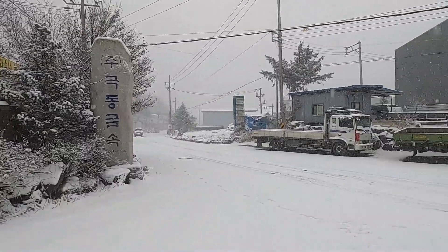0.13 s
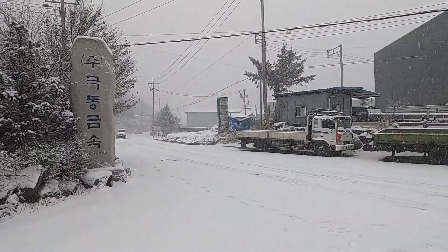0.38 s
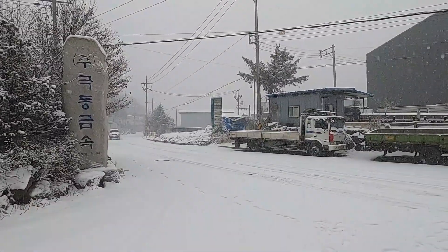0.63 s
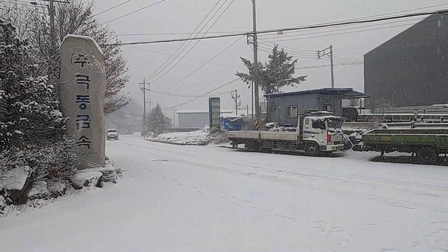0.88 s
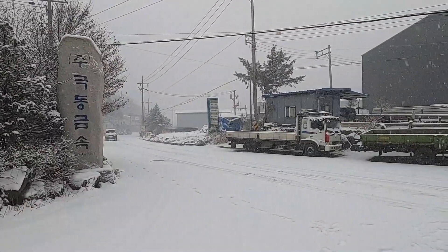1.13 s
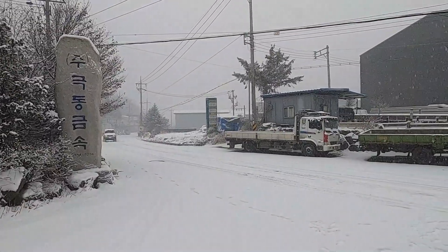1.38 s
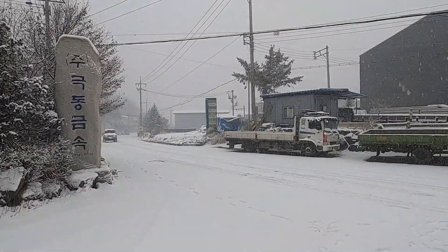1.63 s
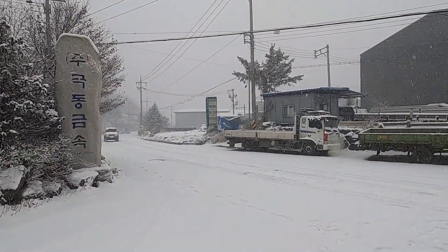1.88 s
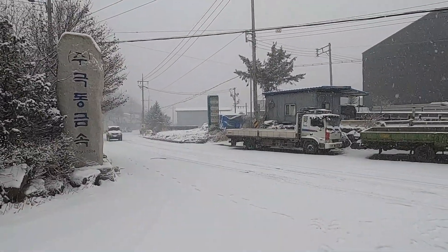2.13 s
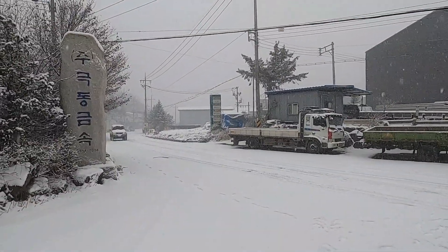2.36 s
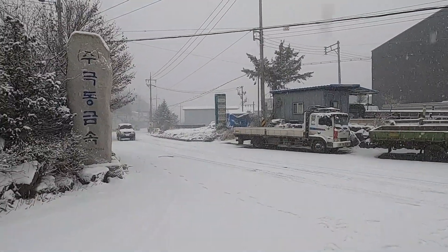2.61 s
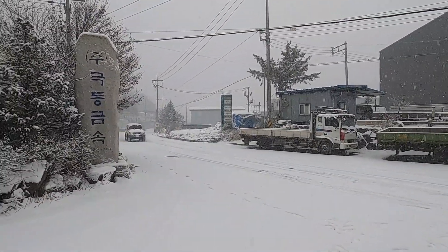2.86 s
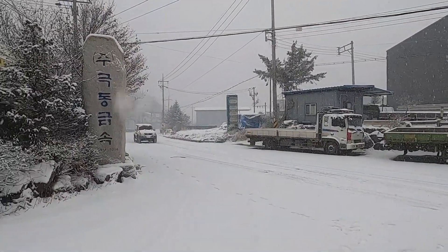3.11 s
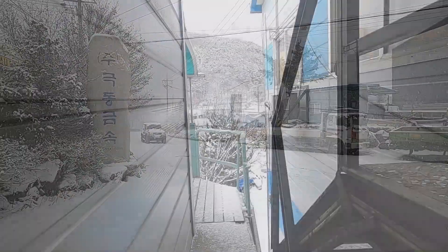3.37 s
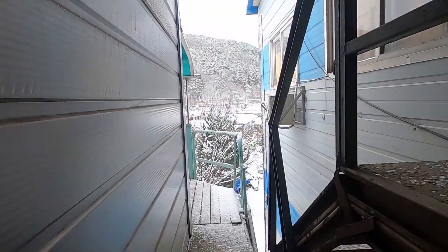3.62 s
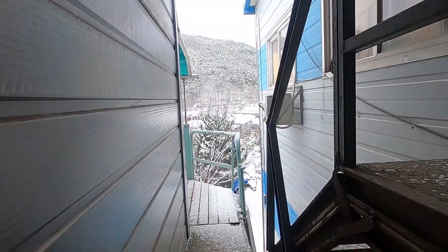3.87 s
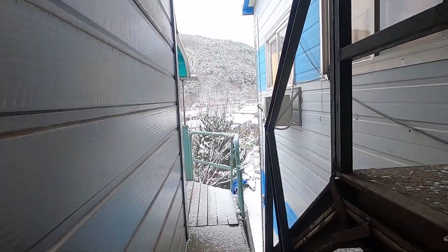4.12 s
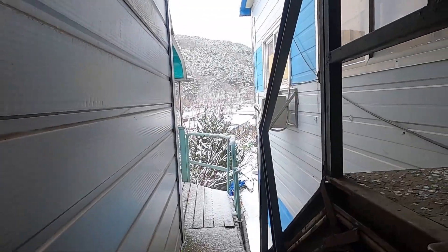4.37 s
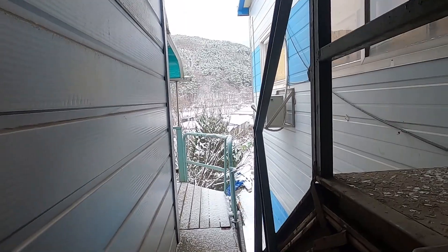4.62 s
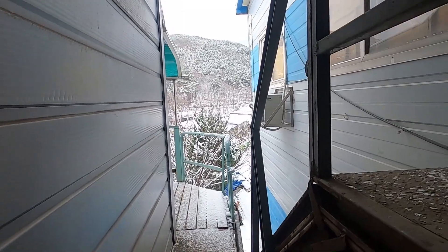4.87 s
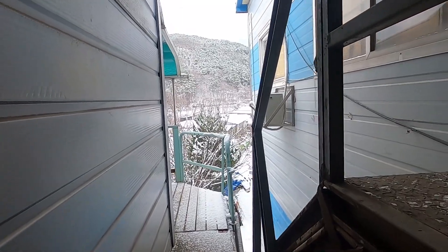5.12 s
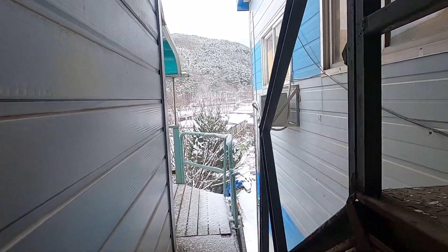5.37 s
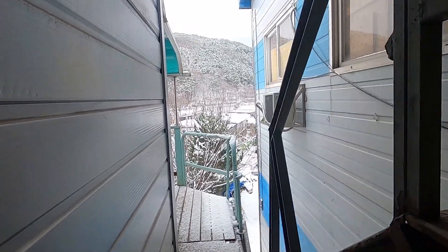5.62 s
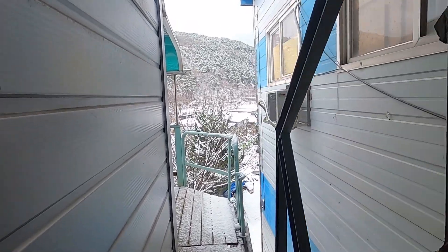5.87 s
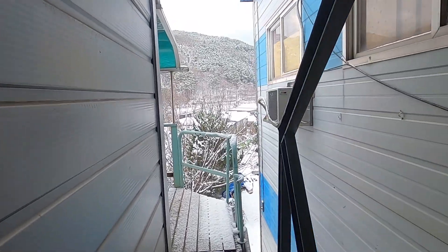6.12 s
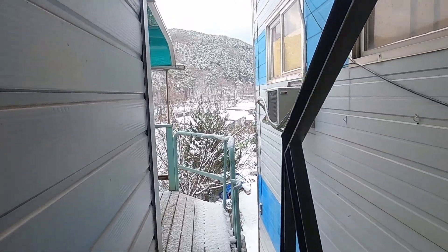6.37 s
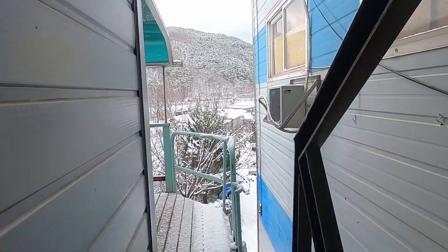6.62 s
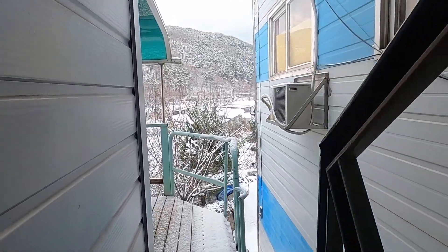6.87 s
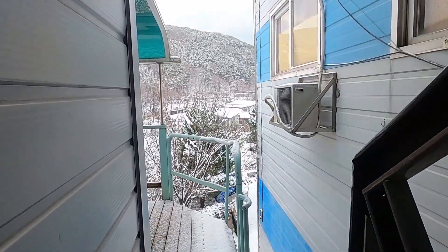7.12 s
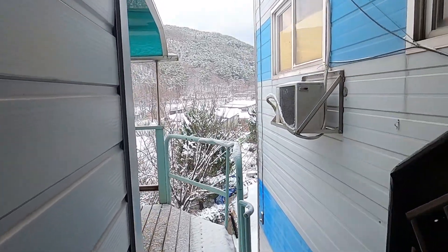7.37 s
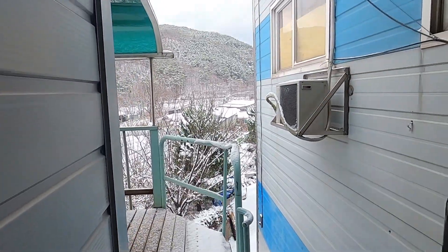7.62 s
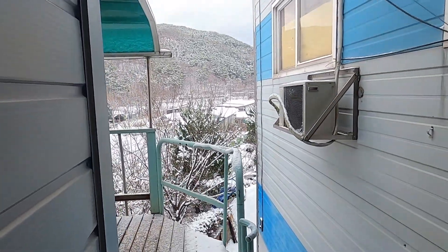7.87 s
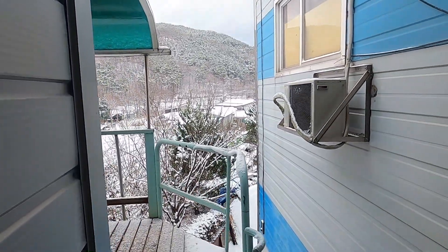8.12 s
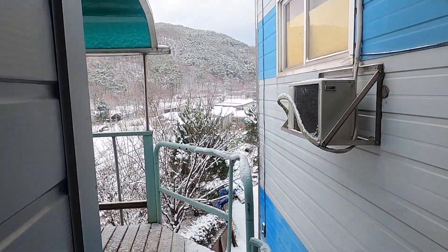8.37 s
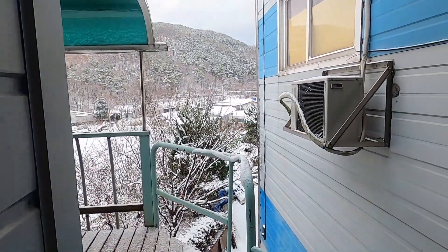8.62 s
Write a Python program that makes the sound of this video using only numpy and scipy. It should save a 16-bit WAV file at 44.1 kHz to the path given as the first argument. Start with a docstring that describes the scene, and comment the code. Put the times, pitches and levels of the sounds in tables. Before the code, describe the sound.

From 0 to 3.4 s, a quiet snowy road: a distant low rumble, a steady engine idling deep, and a slowing car coming nearer, its hum sliding down from about 1.5 s while soft tyre hiss swells. One tiny flake tick lands near 0.8 s. At 3.4 s all this stops dead, leaving a gap of about 0.2 s. From 3.6 s, close footsteps on a snowy wooden deck between metal walls: first small, dry crackles and grainy crunches, thickening from 4.4 to 5.3 s. Deep hollow thuds come around 5.4 and 6.2 s, with a sharp snap at 6.4 s. A heavier crunch at 7 s carries a very short squeak. From 7.5 to 8.1 s it is loudest, with icy knocks, bright snaps and low microphone shaking; a thud near 8.3 s and smaller crunches follow to the end at about 8.7 s. Sound begins wide, narrows on the deck, then widens.

```python
"""Someone walks on a snowy deck between metal walls: grain noise crunches, noise bursts snap off the crust,
each footfall rings damped modes in the boards, and low noise swells as the hand shakes the microphone.
Before it, up to a sharp cut and a short silence, snow falls on a quiet road: a slowing car, summed from sines,
comes near with hissing tyres of filtered noise, while another engine idles over a rumble and a hum."""
import sys
import numpy as np
from scipy import signal
from scipy.io import wavfile

SR = 44100
rng = np.random.default_rng(int(sys.argv[2]) if len(sys.argv) > 2 else 0)


def inscribe(sig):
    """Save sig as 16-bit PCM at rate SR to the path in sys.argv[1].

    A 1-D sig is mono; a 2-D sig holds one channel per row.
    Samples are clipped to [-1, 1] before scaling.
    """
    pcm = np.round(np.clip(np.atleast_2d(sig).T, -1, 1) * 32767)
    wavfile.write(sys.argv[1], SR, pcm.astype(np.int16))


def boost_factor(decibels):
    """Convert a level in decibels to a linear amplitude factor."""
    exponent = np.asarray(decibels, float) / 20
    return 10 ** exponent


N = 385434
CUT_S, RETURN_S, FADE_IN_S = 3.371, 3.565, .07   # road ends, deck begins, deck fade-in

# a sole presses into the snow: t/s, peak level/dB, hold/s,
# treble slope/dB per 2.3 octaves above 3 kHz, low slope/dB per octave below 1.1 kHz
PRESSES = [(3.62, -60.5, 0.08, 3, 4.5), (3.74, -53, 0.007, 4, 0), (3.87, -51, 0.0097, -9, 1.5),
           (4.055, -51.5, 0.024, -11, 6), (4.15, -53.5, 0.11, -0.5, -2.5), (4.27, -52.5, 0.064, 6.5, 7.5),
           (4.42, -49, 0.17, 4.5, 5.5), (4.715, -48, 0.044, 15.5, -2.5), (4.87, -46, 0.011, 16, -1.5),
           (4.95, -49, 0.085, 7, -2), (5.12, -56.5, 0.035, 18.5, 4), (5.28, -44.5, 0.15, 9.5, -1.5),
           (5.56, -47, 0.027, 3, 2), (5.725, -48.5, 0.0027, 10, -2), (5.895, -47, 0.1, 5, 0.5),
           (6.07, -50, 0.048, -0.5, -3), (6.197, -46.5, 0.062, 1, 3.5), (6.39, -48, 0.066, 4, -3.5),
           (6.5, -52, 0.039, 2, -3), (6.6, -49.5, 0.021, 6, 2), (6.85, -50, 0.0038, 5, -22),
           (6.95, -40.5, 0.094, 5, 0.5), (7.27, -49.5, 0.048, 9, -2.5), (7.1, -53, 0.028, -1, 4.5),
           (7.41, -49, 0.059, 10, -12), (7.53, -40.5, 0.066, 6.5, 2), (7.61, -39, 0.012, 0, 7.5),
           (7.74, -39.5, 0.12, 1.5, 3), (7.98, -36, 0.046, 4, -1), (8.17, -42, 0.022, -3.5, -7),
           (8.31, -42.5, 0.097, 6, -2), (8.55, -44, .2, 7.5, -3.5)]


def presses():
    """Loading and unloading: the crunch level rises and falls linearly in dB around each press."""
    return swells(PRESSES, rise=154, fall=105)   # dB per s


# spectrum of crunching snow: f/Hz, relative level/dB per Hz
SNOW = [(150, -8.5), (250, 2), (372, -6.5), (458, -1.5), (544, -7), (681, -8.5), (1070, -4.5), (3450, -9),
        (5220, -14), (9890, -26), (12800, -29.5), (14500, -23), (15500, -59)]
# left-right likeness on the deck: f/Hz, correlation
DECK_ALIKE = [(170, .9998), (550, 0.97), (1650, 0.94), (5000, 0.6), (9000, -0.085), (12000, -0.83)]


def crunch(white, level_db, treble_db, low_db):
    """Granular fracture: noise whose strength leaps at random moments and dies in milliseconds."""
    breaks = (rng.random(N) < 110 / SR) * boost_factor(3.0 * np.minimum(rng.exponential(1, N), 2.5))
    clumps = signal.lfilter([1], [1, -np.exp(-1 / (0.003 * SR))], breaks)
    fine = (rng.random(N) < 1500 / SR) * boost_factor(2.9 * np.minimum(rng.exponential(1, N), 3))
    grains = signal.lfilter([1], [1, -np.exp(-1 / (0.00044 * SR))], fine)
    strength = rms_one(0.53 + 0.5 * clumps + 0.15 * grains)

    def colour(hz):
        treble = treble_db * np.clip(np.log2(hz / 3000), 0, 2.1) / 2.3
        return treble + low_db * np.clip(np.log2(1100 / hz), 0, 1)

    return boost_factor(level_db) * bands(SNOW, DECK_ALIKE, white * strength, patchy_db=1.3, flicker=25.0, tilt_db=colour)


# crust snapping: t/s, body peak level/dB, f/Hz, treble level re body peak/dB
SNAPS = [(3.821, -38, 1100, -38), (3.873, -35.5, 2600, -30), (3.893, -32, 2434, -34),
         (4.049, -34, 2353, -34), (4.066, -49, 3798, -17), (4.113, -33, 3160, -8.5),
         (4.23, -37.5, 2840, -2.5), (4.269, -37.5, 2500, -20), (4.278, -42, 3000, -11),
         (4.367, -40.5, 2520, -9), (4.406, -32.5, 1480, -12), (4.486, -32, 1490, -14),
         (4.504, -40, 3500, -3), (4.547, -39.5, 3000, -2), (4.628, -40, 1500, -1), (4.663, -32, 3000, -5),
         (4.714, -32, 3430, -11), (4.796, -31.5, 2600, -5), (4.822, -35.5, 2500, -12),
         (4.857, -31, 3000, -6.5), (4.866, -48, 2500, 19.5), (4.874, -30, 2500, -13),
         (4.885, -27.5, 3500, -15), (4.893, -41, 2500, -9), (4.934, -30, 3460, -5),
         (4.996, -28.5, 3500, -13), (5.029, -32.5, 2510, -3), (5.11, -25.5, 3175, -2),
         (5.14, -30, 3080, -5.5), (5.723, -32, 1500, -8), (5.882, -38, 2470, -23), (6.188, -31.5, 790, -22),
         (6.306, -34, 700, -30), (6.388, -21.5, 2757, -36), (6.555, -40, 4000, -3),
         (6.586, -33.5, 2350, -11), (6.604, -34, 2090, -10), (6.62, -31, 2600, -17),
         (6.638, -33, 4500, -19), (6.675, -35, 3150, -14), (6.795, -32.5, 3020, -33),
         (6.938, -32, 1490, -17), (7.0, -27, 1500, -12), (7.016, -27, 4230, -22), (7.182, -30, 2320, -30),
         (7.268, -31, 3346, -30), (7.51, -30.5, 4480, -15.5), (7.543, -22.5, 1520, -12),
         (7.586, -28, 3550, -15), (7.614, -22, 3500, -10), (7.631, -24.5, 1960, -19),
         (7.826, -21.5, 2800, -15), (7.897, -26, 1040, -30), (7.945, -25.5, 1780, -19),
         (7.952, -22.5, 1240, -21), (8.001, -19, 2540, -20), (8.006, -18, 940, -21),
         (8.022, -27.5, 2050, -20), (8.172, -35, 3000, -18), (8.292, -39.5, 1800, -9),
         (8.308, -35.5, 4500, -14), (8.466, -37, 5000, -4.5), (8.569, -25, 2510, -13),
         (8.655, -35, 3000, -9), (8.72, -52, 3500, -7)]


def crust(level_db, treble_db):
    """Brittle fracture: placed snaps of the crust and a random crackle of small ones."""
    placed = snaps(SNAPS, burst_s=0.0048, width=1.504)
    return placed + snaps(crackle(level_db, treble_db, count=260), burst_s=0.0017, width=1.52)


def crackle(level_db, treble_db, count):
    """Random emission: small snaps, as loud as the crunch around them allows, each with its own pitch."""
    when, size, pitch = rng.random((count, 3)).T
    s = RETURN_S + when * (N / SR - RETURN_S)
    at = (s * SR).astype(int)
    peak_db = level_db[at] + 3.0 + 10.5 * size ** 4.2
    return np.transpose([s, peak_db, 1400 * 4.0 ** pitch, treble_db[at] - 25.0])


def snaps(events, burst_s, width):
    """Impulsive excitation: a crack and dying noise, part resonant, part in the middle range, part bright."""
    out, t = np.zeros((2, N + 4096)), np.arange(4096) / SR
    bright = signal.butter(2, [4500, 11500], "band", fs=SR, output="sos")
    broad = signal.butter(2, [800, 5000], "band", fs=SR, output="sos")
    envelope = (np.exp(-t / burst_s) + 1.4 * np.exp(-t / 0.0004)) * np.minimum(t / 0.00027, 1)
    for s, peak_db, hz, treble_db in events:
        burst = rng.standard_normal((3, len(t))) * envelope
        resonance = signal.butter(2, [hz / width, hz * width], "band", fs=SR, output="sos")
        ring = signal.sosfilt(resonance, burst[0] + 0.22 * burst[1:])
        body = rms_one(ring) + .5 * rms_one(signal.sosfilt(broad, burst[1]))
        top = signal.sosfilt(bright, 0.1 * burst[0] + burst[1:])   # mostly unlike left and right
        snap = body / np.abs(body).max() + boost_factor(treble_db) * top / np.abs(top).max()
        out[:, round(s * SR):][:, :len(t)] += boost_factor(peak_db) * snap
    return out[:, :N]


# echoes from the metal walls: delay t/s, level/dB
WALL_ECHOES = [(.0046, -24), (.0083, -29), (.0131, -13.5), (.021, -14.5)]


def walls(x):
    """Early reflection: close metal walls throw back a few quick echoes, from alternate sides."""
    out = x.copy()
    for k, (s, level_db) in enumerate(WALL_ECHOES):
        lag = round(s * SR)
        left_db = 1.3 * (-1) ** k   # left over right
        sides = np.array([[boost_factor(left_db / 2)], [boost_factor(-left_db / 2)]])
        out[:, lag:] += boost_factor(level_db) * sides * x.mean(axis=0)[:-lag]
    return out


# a short squeak of packed snow: t/s, f/Hz, peak level/dB
SQUEAK = [(7.025, 905, -44), (7.051, 1087, -39), (7.09, 940, -51)]


def squeak():
    """Frequency and amplitude modulation: a rough tone as snow packs under the sole."""
    hz, level_db = in_time(SQUEAK)
    start, end = SQUEAK[0][0], SQUEAK[-1][0]
    on = np.interp(np.arange(N) / SR, [start - .01, start, end, end + 0.0091], [0, 1, 1, 0])
    turn = 2 * np.pi * np.cumsum(hz * (1 + 0.0322 * drift(78.6))) / SR
    return on * boost_factor(level_db + 2.0 * drift(60)) * np.sin(turn)


# footfalls and their bounces: t/s, push level/dB, lowest modes re push/dB, upper modes re push/dB
THUDS = [(3.907, -29.5, -1, -27), (4.052, -35, 0, 4), (5.359, -19, -3, -32), (5.376, -25, -19, 1),
         (5.46, -10, -3, -22), (5.477, -29, 10, 11.5), (5.687, -29, -6, -29), (5.909, -31, -5, -9),
         (6.185, -5, -38, -9), (6.229, -16.5, 9, -28), (6.309, -14, 1.5, -8), (6.449, -26.5, 7.5, -36),
         (6.899, -19.5, 5.5, -5.5), (6.915, -23.5, 12, -2), (7.542, -42.5, -15, 9),
         (7.574, -29.5, -12, 6.5), (7.595, -24, -10, -2), (7.695, -23.5, -10, 8.5), (7.711, -21, -8, -1),
         (7.738, -27, -20, 7), (8.188, -27.5, 8, 7), (8.267, -21, -5.5, -15)]
# deck modes: f/Hz, relative level/dB, t60/s
DECK = [(42.5, -14, 0.62), (83, 1.5, 0.24), (109, -7.5, 0.41), (139.5, 1.5, 0.31), (183, 1.5, 0.17),
        (204, 5, 0.059), (243, -11, 0.44), (328, -12, 0.25), (436, -9.5, 0.032)]


def thuds():
    """Modal resonance: a sole sets all the deck's modes ringing, each with a strength of its own."""
    s, push_db, lowest_db, upper_db = np.transpose(THUDS)
    scatter_db, out = rng.normal(0, 1.2, (len(s), len(DECK))), np.zeros(N)
    for k, (hz, level_db, t60) in enumerate(DECK):
        tilt_db = lowest_db * (hz < 95) + upper_db * (hz > 160)
        push = np.full(N, 1e-18)
        push[np.round(s * SR).astype(int)] = -boost_factor(push_db + level_db + tilt_db - 11.5 + scatter_db[:, k])
        # a two-pole resonator that loses 60 dB in t60
        r, w = boost_factor(-60 / (t60 * SR)), 2 * np.pi * hz / SR
        out += signal.lfilter([0, np.sin(w)], [1, -2 * r * np.cos(w), r * r], push)
    return signal.sosfilt(signal.butter(2, [42, 480], "band", fs=SR, output="sos"), out)


# knocks on the boards, from soft bumps to hard lumps of ice: t/s, starting envelope level/dB, f/Hz
KNOCKS = [(3.742, -39, 35.8), (4.051, -32.5, 61.6), (4.076, -33, 130), (7.545, -24, 415),
          (7.5893, -14.5, 850), (7.589, -28, 370), (7.6336, -11.5, 296), (7.632, -15.5, 720),
          (7.898, -25.5, 298.5), (7.954, -22.5, 324), (8.004, -23, 330)]


def knocks():
    """Damped oscillation: each knock is a short ring of a few cycles."""
    out, t = np.zeros(N + 4096), np.arange(4096) / SR
    cycles = 1.17   # to fall to 1/e, about a third
    for s, level_db, hz in KNOCKS:
        ring = np.exp(-t * hz / cycles) * np.sin(2 * np.pi * hz * t)
        out[round(s * SR):][:len(t)] -= boost_factor(level_db) * ring
    return out[:N]


# weight shifts onto a foot and the hand shakes: t/s, peak level/dB, hold/s
SHAKES = [(3.74, -54, .02), (4.07, -68, 0.0081), (4.3, -62, 0.21), (5.47, -40, 0.023), (6.2, -43, 0.19),
          (6.95, -44, 0.21), (7.7, -30.5, 0.065), (8.3, -30, 0.0085)]
# spectrum of the shaken microphone: f/Hz, relative level/dB per Hz
DEEP = [(18, -43), (35, 12), (55, -12.5), (90, -6.5), (150, -39)]
# spectrum of the working boards: f/Hz, relative level/dB per Hz
BOARDS = [(60, -7), (110, -14.5), (150, -1.5), (200, -10), (300, -38.5), (500, -19)]


def shudder(white):
    """Handling noise: the hand shakes the microphone, and boards working under the weight follow more weakly."""
    still_db = -79
    deep_db = np.maximum(swells(SHAKES, rise=152, fall=86)[0], still_db)   # rise, fall in dB per s
    boards_db = -56.5 + 0.42 * (deep_db + 60)   # -56.5 dB where the shake is at -60 dB
    deep = boost_factor(deep_db) * bands(DEEP, DECK_ALIKE, white, patchy_db=1.0, flicker=10.0)
    return deep + boost_factor(boards_db) * bands(BOARDS, DECK_ALIKE, white, patchy_db=5.0, flicker=6.0)


# slowing car: t/s, firing f/Hz, firing rms level/dB, second order rms level/dB, third order rms level/dB
CAR = [(0, 64.65, -42, -65, -61.5), (.5, 64.84, -38, -62, -62.5), (1.25, 65.54, -40.5, -61, -62),
       (1.45, 64.4, -38.5, -52.5, -54.5), (1.72, 58.2, -35.5, -50, -59), (1.9, 58.94, -37, -49, -54.5),
       (2.15, 53.56, -43.5, -52.5, -54.5), (2.35, 50.46, -36.5, -47.5, -65),
       (2.8, 49.37, -33.5, -47.5, -64.5), (3.37, 48.94, -34.5, -45, -55)]


def car():
    """Harmonic synthesis: three engine orders, near sines that waver more the higher they are."""
    hz, *orders_db = in_time(CAR)
    turn = 2 * np.pi * np.cumsum(hz) / SR
    out = np.zeros(N)
    for k, db in enumerate(orders_db):
        waver_db = 1.18 * (k + 1.5) * drift(8.1)
        out += np.sqrt(2) * boost_factor(db + waver_db) * np.sin((k + 1) * turn)
    return out


# spectrum of the tyre hiss: f/Hz, relative level/dB per Hz
TYRES = [(530, -38), (950, -8.5), (1190, -3.5), (1510, -2.5), (2030, -5), (2790, -6.5), (3530, -6.5),
         (7580, -22), (15000, -50.5)]
# the car comes near: t/s, tyre hiss level/dB, tyre band f/Hz, middle hum level/dB
ROAD = [(0, -62.5, 1318, -63.5), (.4, -64, 1346, -68.5), (1.0, -64, 1266, -75.5), (1.65, -62, 1222, -73.5),
        (2.4, -61.5, 1399, -71), (2.9, -59, 1475, -69), (3.37, -55.5, 1470, -66.5)]
# left-right likeness on the road: f/Hz, correlation
ROAD_ALIKE = [(170, .9998), (550, 0.97), (1650, 0.97), (5000, 0.93), (12000, 0.52)]


def tyres(white):
    """Filtered noise: tyres hiss in the snow with one strong band, and a thin whine grows."""
    hiss_db, band_hz, _ = in_time(ROAD)
    near_db = hiss_db + 60   # hiss above -60 dB
    hiss = boost_factor(hiss_db) * bands(TYRES, ROAD_ALIKE, white, patchy_db=1.83, flicker=45.0)
    # band and whine change faster than the hiss
    band = boost_factor(-64 + 1.3 * near_db) * narrow(band_hz, 240)
    whine = boost_factor(-78.5 + 3.7 * near_db) * narrow(797, 43)
    return hiss + band + whine


# idling engine: t/s, firing f/Hz
IDLE = [(0, 44.6), (.6, 44.9), (1.2, 43.83), (1.6, 45.82), (2.0, 45.55), (2.4, 43.43), (2.8, 43.4),
        (3.0, 43.4), (3.37, 42.1)]
# its strength: t/s, rms level/dB
IDLE_LEVEL = [(0, -47), (1.4, -46), (2.0, -43), (2.6, -44), (3.37, -40)]


def idle():
    """Periodic firing: the idling engine is one near sine that wavers a little."""
    hz, level_db = in_time(IDLE) + in_time(IDLE_LEVEL)
    turn = 2 * np.pi * np.cumsum(hz) / SR
    return np.sqrt(2) * boost_factor(level_db + 1.2 * drift(3.0)) * np.sin(turn)


# flakes on the casing: t/s, body peak level/dB, f/Hz, treble level re body peak/dB
TICKS = [(0.439, -59, 2600, 6), (0.7593, -40.5, 3430, -14)]


def flakes():
    """Impact noise: flakes tick on the casing as very short bursts."""
    return snaps(TICKS, burst_s=0.0011, width=1.4)


# spectrum of the distant rumble: f/Hz, relative level/dB per Hz
RUMBLE = [(12, -42.5), (20, -18.5), (46, -10), (68, -4.5), (85, -11.5), (114, -12.5), (198, -14.5),
          (286, -27), (439, -35.5), (600, -35.5), (780, -82.5)]
# spectrum of the middle hum: f/Hz, relative level/dB per Hz
HUM = [(350, -7.5), (500, -5.5), (700, -5), (1000, -10.5)]


def distance(white):
    """Shaped noise: a distant rumble flickers, and a hum in the middle range changes slowly."""
    hum_db = in_time(ROAD)[2]
    rumble = boost_factor(-50) * bands(RUMBLE, ROAD_ALIKE, white, patchy_db=3.0, flicker=3.2)
    return rumble + boost_factor(hum_db) * bands(HUM, ROAD_ALIKE, white, patchy_db=0.0, flicker=5.9)


def bands(spectrum, likeness, source, patchy_db, flicker, tilt_db=lambda hz: 0):
    """Subband synthesis: third-octave stereo noise, each band flickering and tilting; rms about 1."""
    out, power = 0, 0
    octaves = np.log2(spectrum[-1][0] / spectrum[0][0])
    edges = spectrum[0][0] * 2 ** np.arange(0, octaves + .01, 1 / 3)
    for k, (low, high) in enumerate(zip(edges, edges[1:])):
        # neighbouring bands draw on separate noise
        band = signal.butter(2, [low, high], "band", fs=SR, output="sos")
        mid, side = signal.sosfilt(band, source[k % 2])
        hz = np.sqrt(low * high)
        alike = np.clip(at_hz(likeness, hz), -1, 1)
        pair = np.sqrt(1 + alike) * mid + np.sqrt(1 - alike) * side * [[1], [-1]]
        pair = boost_factor(at_hz(spectrum, hz)) * pair
        out = out + pair * boost_factor(patchy_db * drift(flicker) + tilt_db(hz))
        power = power + np.mean(pair ** 2)
    return out / np.sqrt(power)


def narrow(hz, width_hz):
    """Quadrature modulation: noise of a given width around a moving centre; rms 1."""
    lowpass = signal.butter(2, width_hz / 2, fs=SR, output="sos")
    slow = signal.sosfilt(lowpass, rng.standard_normal((2, N)))
    turn = 2 * np.pi * np.cumsum(hz + np.zeros(N)) / SR
    return rms_one(slow[0] * np.cos(turn) + slow[1] * np.sin(turn))


def swells(events, rise, fall):
    """Power summation: events rise, hold and fall in dB; gives level and power-weighted columns."""
    s, peak_db, held, *columns = np.transpose(events)[:, :, None]
    t = np.arange(0, N + 64, 64) / SR
    each_db = peak_db - rise * np.maximum(s - t, 0) - fall * np.maximum(t - s - held, 0)
    power = boost_factor(2 * np.maximum(each_db, -200))
    total = power.sum(axis=0)
    weighted = [(power * c).sum(axis=0) / total for c in columns]
    return in_time(np.transpose([t, 10 * np.log10(total)] + weighted))


def drift(rate):
    """Low-pass noise: slow chance of spread 1 with both poles at rate (Hz), made at SR / 40."""
    r = np.exp(-80 * np.pi * rate / SR)
    slow = signal.lfilter([1], [1, -2 * r, r * r], rng.standard_normal(N // 40 + 2002))[2000:]
    return np.interp(np.arange(N) / 40, np.arange(len(slow)), rms_one(slow))


def rms_one(x):
    """Normalisation: scale to rms 1."""
    return x / np.sqrt(np.mean(x ** 2) + 1e-20)


def in_time(rows):
    """Linear interpolation: columns of a curve at every sample."""
    s, *columns = np.transpose(rows)
    return [np.interp(np.arange(N) / SR, s, c) for c in columns]


def at_hz(points, hz):
    """Logarithmic frequency: read a table on a log-frequency axis."""
    f, value = np.transpose(points)
    return np.interp(np.log(hz), np.log(f), value)


def scene():
    """Superposition: the road sounds stop dead; the deck sounds fade in after the gap."""
    t, white = np.arange(N) / SR, rng.standard_normal((2, 2, N))
    street = car() + idle() + tyres(white) + distance(white) + flakes()
    level_db, treble_db, low_db = presses()
    snow = crunch(white, level_db, treble_db, low_db) + walls(crust(level_db, treble_db)) + squeak()
    deck = snow + thuds() + knocks() + shudder(white)
    street_gain = np.clip((CUT_S - t) * SR / 2, 0, 1)   # two samples long
    deck_gain = np.clip((t - RETURN_S) / FADE_IN_S, 0, 1) ** 2
    return street * street_gain + deck * deck_gain


# stereo image: t/s, side level below the top octave/dB
IMAGE = [(0, 1.5), (3.4, 6.5), (3.6, -26), (6.2, -18), (6.4, -8.5), (6.9, -4), (8.74, 1.5)]
# lean to the left: t/s, share of the middle range of mid added to side
LEAN = [(6.4, 0), (7.6, .13), (8.74, .2)]


def image(dry):
    """Mid-side stereo: the width changes below 10.8 kHz and the middle range comes to lean left."""
    mid, side = (dry[0] + dry[1]) / 2, (dry[0] - dry[1]) / 2
    top = signal.sosfilt(signal.butter(8, 10800, "high", fs=SR, output="sos"), side)
    below = signal.sosfilt(signal.butter(8, 10800, fs=SR, output="sos"), side)
    middle = signal.sosfilt(signal.butter(2, [700, 4500], "band", fs=SR, output="sos"), mid)
    side = boost_factor(-11.5) * top + boost_factor(in_time(IMAGE)[0]) * below + in_time(LEAN)[0] * middle
    return np.array([mid + side, mid - side])


def band_limit(x):
    """A steep low-pass at the top of the band."""
    return signal.sosfilt(signal.butter(12, 15800, fs=SR, output="sos"), x)


def record(dry):
    """Band limiting: the microphone fades in the highest treble."""
    mix = signal.sosfilt(signal.butter(4, 14000, fs=SR, output="sos"), image(dry))
    return band_limit(mix)


dry = scene()
out = record(dry)
inscribe(out)
```